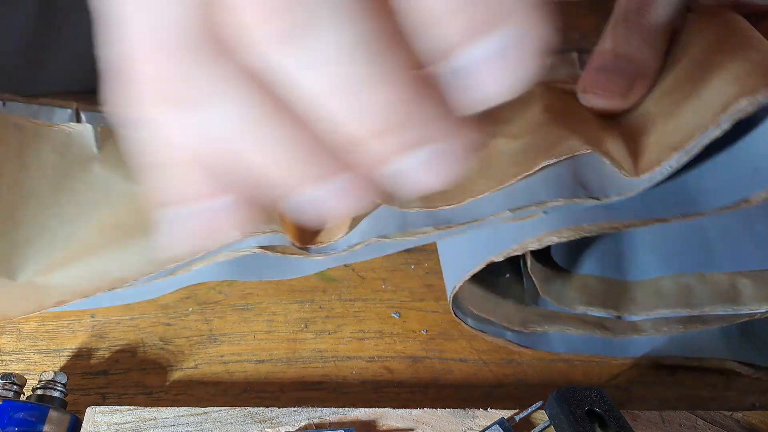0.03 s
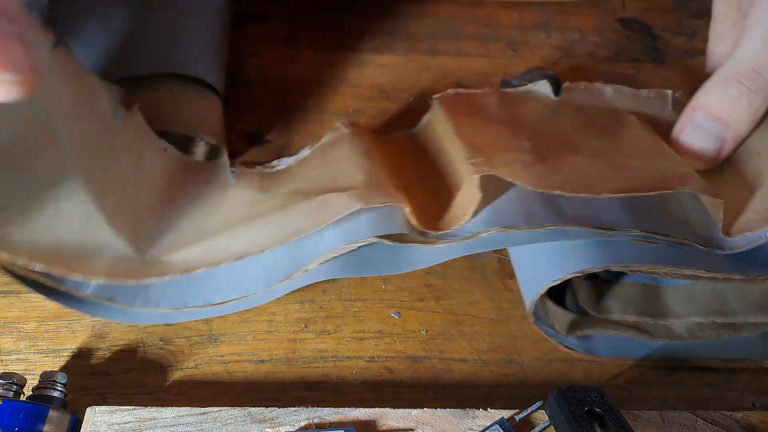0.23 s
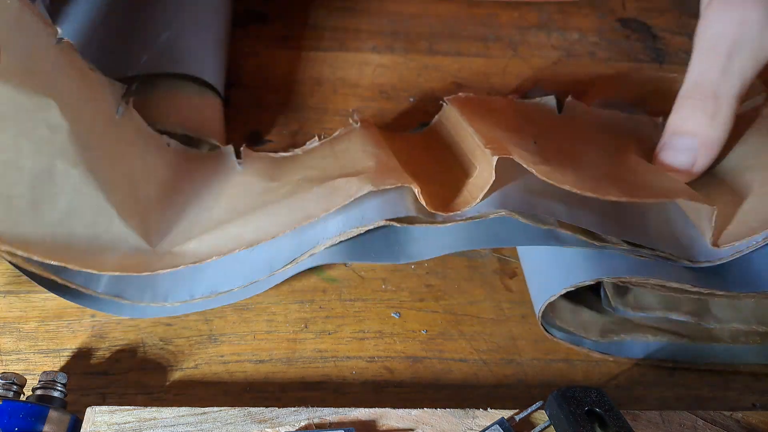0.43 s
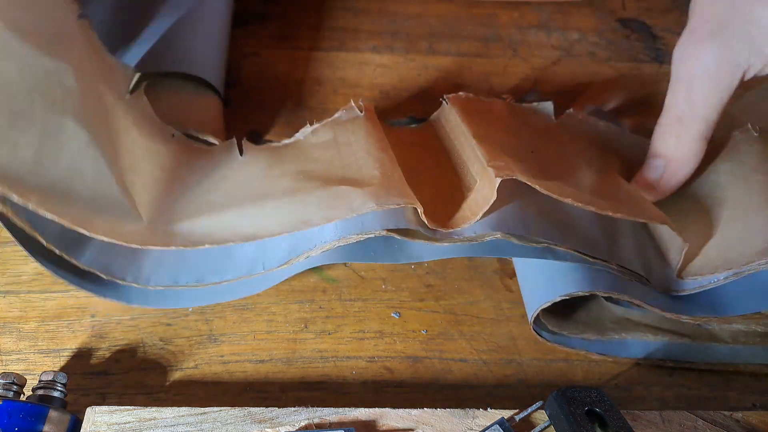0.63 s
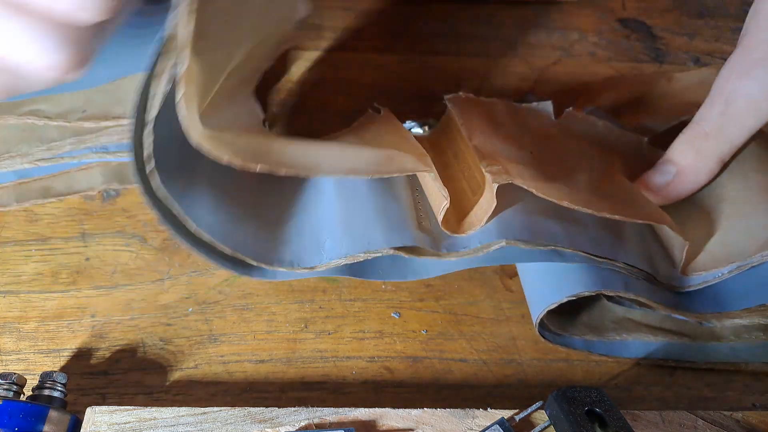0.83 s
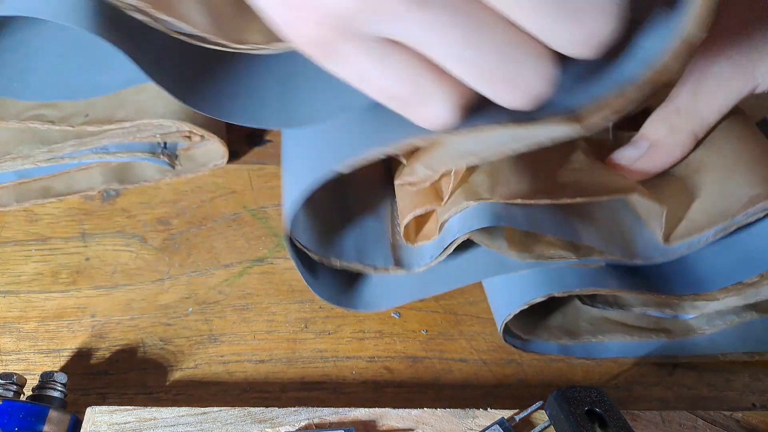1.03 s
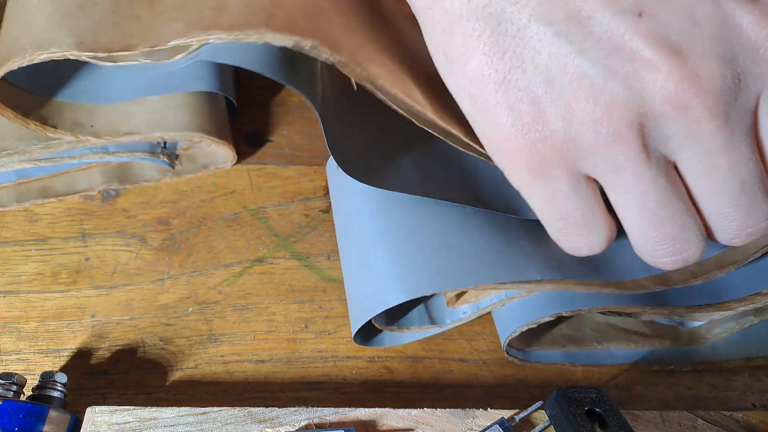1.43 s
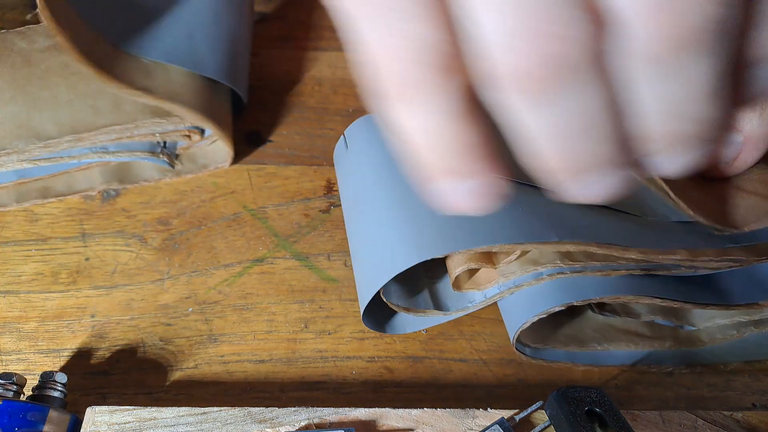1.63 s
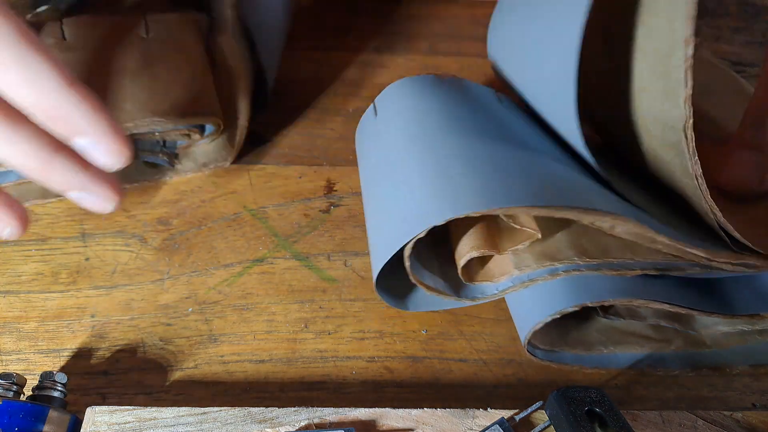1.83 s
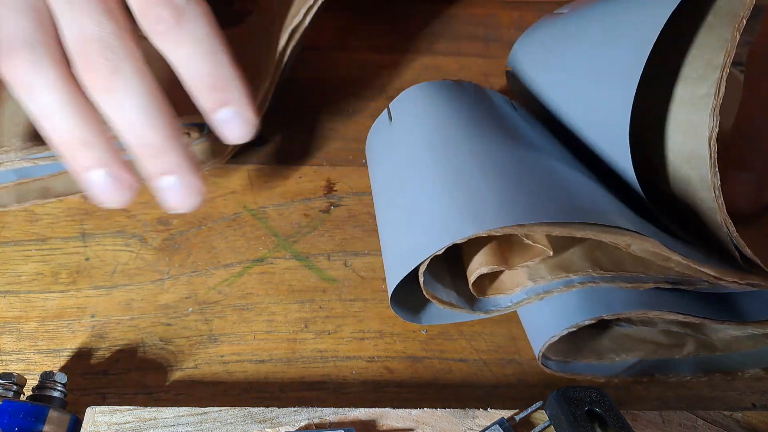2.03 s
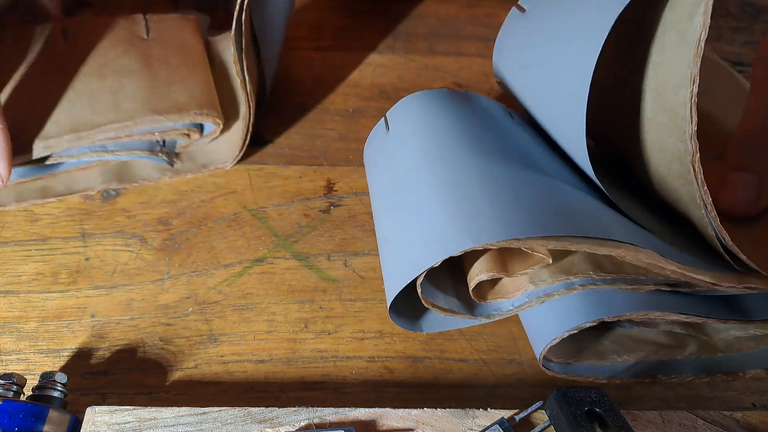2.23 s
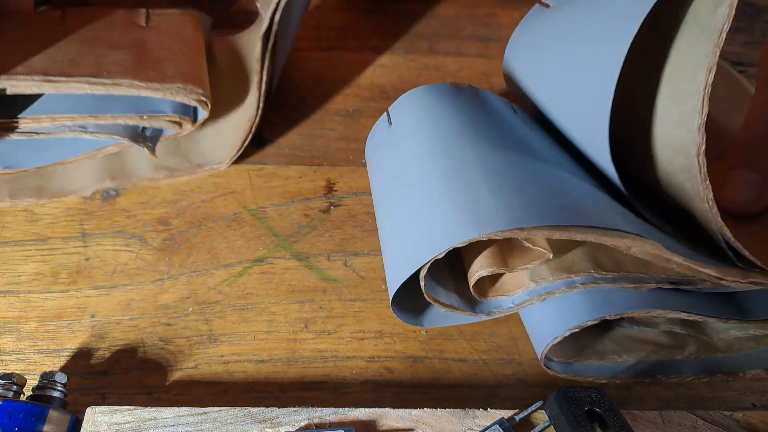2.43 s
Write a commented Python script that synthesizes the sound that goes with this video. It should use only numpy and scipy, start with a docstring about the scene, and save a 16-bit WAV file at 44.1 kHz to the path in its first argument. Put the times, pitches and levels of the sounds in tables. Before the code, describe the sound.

Foil and paper crinkle and rustle close to a stereo microphone in a quiet room. Scattered crease snaps build to a sharper cluster as the strips fold, then fade to light rustles, with soft table bumps underneath.

```python
"""A wooden table in a small quiet room, a stereo pair of microphones close to the hands.
Stiff strips of foil and paper are unrolled and folded. Sliding, they rustle with tiny clicks; bending,
they swish and pop. Creases snap through, each ringing the sheet for a few ms, and in the taut fold the
foil rings on. Hands and rolls bump the table softly, and the walls answer the sheets with a short tail."""
import sys
import numpy as np
from scipy import signal
from scipy.fft import rfft, irfft
from scipy.io import wavfile

SR = 44100
rng = np.random.default_rng(int(sys.argv[2]) if len(sys.argv) > 2 else 0)


def master(y):
    """Save y as 16-bit WAV."""
    cut = np.clip(np.atleast_2d(y).T, -1, 1)
    pcm = np.round(cut * 32767)  # scale
    wavfile.write(sys.argv[1], SR, pcm.astype(np.int16))


N = 110250

# Creases snapping through. Each row: start in seconds, low, middle, high and top band levels in dB,
# the facet's own note in Hz, its relative level in dB, left over right in dB.
SNAPS = [(0.0244, -50, -45.0, -45, -55, 4370, -47, -3), (0.054, -49.0, -50, -37.5, -43, 2800, -37, 5.0),
         (0.1166, -43.0, -43, -59, -59, 1542, -38, -4), (0.2103, -37.5, -42, -44, -55, 1840, -33, -4),
         (0.2305, -52, -47, -42, -53, 6550, -34, 1), (0.3025, -39.5, -44, -42, -55.0, 3920, -37, 1),
         (0.3403, -36.5, -31.5, -35, -43.0, 1860, -40, -4.5), (0.3981, -61, -55.0, -44, -49, 6330, -44, 2),
         (0.462, -43, -43.0, -35, -45, 6050, -42, 1.0), (0.5224, -35.5, -41, -41.0, -59, 3560, -29, -2.5),
         (0.5709, -45.5, -48.0, -41.5, -49, 2000, -49, -5), (0.6136, -50, -49, -45, -39.5, 1900, -46, -14),
         (0.6841, -54, -47, -33.5, -32, 4800, -34, -5), (0.7446, -64, -47, -34, -49.0, 5430, -36, 9),
         (0.8394, -48.5, -44.5, -45, -54, 1770, -53, -1), (0.8688, -66, -46, -30.5, -31.5, 6000, -37, -2.5),
         (0.8887, -36, -31.5, -26.5, -26, 1980, -31.5, 2.0), (0.9135, -58, -58, -30, -38, 6520, -40, -9),
         (0.9217, -56, -47, -32, -33, 5330, -36, -4.0), (0.943, -54, -35.5, -38.0, -48, 4100, -34, 13.0),
         (0.988, -52, -35, -53, -50.0, 2490, -29.5, -3), (1.0184, -52, -42, -35.0, -42, 6450, -30, 17),
         (1.0265, -50, -40, -38, -42, 5200, -42, 4), (1.0647, -54, -37, -38, -54, 2000, -41, 5),
         (1.1032, -40, -48, -49, -42, 3970, -41, 0), (1.1192, -36.5, -23.5, -20.5, -21.0, 2810, -21, -4),
         (1.1343, -50, -43, -38, -35, 2500, -40, -4), (1.146, -50, -43, -36, -37, 4800, -40, -3),
         (1.15, -54, -40, -36, -30.0, 4760, -41, -8.0), (1.1579, -59, -40, -32, -37, 4820, -19.5, -7),
         (1.1721, -44, -33, -34.0, -39.0, 2790, -29, 1), (1.2184, -49, -39, -40, -52.0, 2580, -28.5, 4.0),
         (1.2281, -35, -38.5, -27, -27.5, 6140, -25, -4.0),
         (1.2556, -36.5, -50, -38.5, -36.0, 4690, -35, -7), (1.269, -54, -35, -39.5, -39, 6700, -27, 6),
         (1.2922, -49, -49, -37.5, -36, 2560, -34, -1.5), (1.3199, -50, -41, -45.5, -55, 3530, -30, 0),
         (1.3914, -42.5, -36.5, -36.0, -41.0, 5030, -30, -6), (1.441, -52, -54, -53, -60, 3900, -54, 0),
         (1.5083, -44, -42, -41.5, -52, 3620, -49, 2), (1.5642, -42.5, -32, -32.5, -35, 3496, -25.5, -2),
         (1.5806, -48, -57, -34.5, -34, 4770, -36, 2), (1.5971, -40, -35.5, -36.5, -49, 2820, -40, 7),
         (1.6337, -65, -37, -38.5, -47, 4470, -41, 8), (1.6505, -49, -50, -28.5, -30, 3840, -40, 7),
         (1.711, -49.5, -41.5, -33, -45.5, 6570, -46, 0), (1.7305, -50, -52, -46, -50, 1610, -50, 0),
         (1.7656, -49, -42, -40, -51, 1900, -38, -1), (1.8179, -57, -48.5, -50.5, -41.5, 4230, -54, 1),
         (1.9202, -54, -53, -58, -66, 1500, -53, 2), (1.9725, -42.5, -38.5, -29, -29.5, 3340, -29, -5.5),
         (2.026, -60, -54, -64.5, -68.0, 2730, -49, 4), (2.1219, -60.5, -59.5, -70, -80, 2190, -49, -15),
         (2.3421, -60, -60.0, -44, -41, 6200, -45, 6), (2.4543, -53, -55, -47, -46.5, 5760, -49, 9)]
# The sliding of the sheets. Each row: time in seconds, relative low, middle and treble levels in dB,
# left over right in dB.
SLIDING = [(0, -60, -50.5, -56, -0.5), (0.042, -50, -43, -45.5, 0), (0.075, -55, -51, -56, -2),
           (0.11, -53, -46.5, -49.5, 2), (0.15, -47.5, -39.5, -43.5, 1.5), (0.26, -50.5, -44.5, -48.5, 2.5),
           (0.31, -46, -42.5, -45.5, 0.5), (0.38, -49.5, -44.5, -50, -1), (0.42, -42, -38.5, -40.5, -1.5),
           (0.46, -47.5, -39, -42, 1.5), (0.505, -52, -50.5, -55, -4), (0.55, -50.5, -48, -55, -2),
           (0.595, -52, -51, -53.5, -1), (0.62, -52, -38, -39, -4.5), (0.65, -55, -53.5, -56, -4),
           (0.675, -50, -47, -53, 0), (0.705, -53, -44.5, -41.5, 2.5), (0.745, -54.5, -45, -56, 1),
           (0.78, -64.5, -57, -65, 1), (0.83, -60.5, -54, -57, 0), (0.86, -53, -50, -53, -1),
           (0.905, -47, -41, -47, -1), (0.925, -54, -38.5, -51, 0), (0.965, -48, -44.5, -55, -0.5),
           (1.031, -42.5, -36, -42, 0.5), (1.09, -47.5, -44, -48, -1), (1.14, -43.5, -38.5, -45, -1.5),
           (1.2, -47.5, -37, -42.5, -2), (1.265, -44, -40, -48, 5.5), (1.31, -54, -48, -53, -4),
           (1.37, -51.5, -48.5, -53.5, 1), (1.44, -52.5, -52.5, -59.5, -0.5), (1.49, -58, -51.5, -52, -1),
           (1.55, -43.5, -41.5, -47, 0), (1.6, -55, -40.5, -53, -1), (1.667, -45, -42, -42, 2),
           (1.695, -64, -53, -67, 0), (1.75, -57.5, -52, -55.5, 0), (1.805, -61.5, -56, -64, 5.5),
           (1.856, -54, -48.5, -53, 2), (1.885, -58.5, -58, -63, -1), (1.96, -55.5, -55, -59, 0.5),
           (2.0, -60, -54, -71, 1), (2.05, -72, -61.5, -72, 2), (2.14, -68, -64, -67, 1.5),
           (2.2, -92, -76.5, -80.5, 0.5), (2.24, -88, -80.5, -77, 3), (2.292, -80, -66, -68.5, 4),
           (2.31, -63, -49, -51.5, 10), (2.335, -57.5, -46, -50, 1.5), (2.365, -70, -57.5, -67, 4),
           (2.395, -71, -64, -65, 3), (2.42, -63.5, -55, -58, 7), (2.5, -68, -51.5, -55.5, 0.5)]
# The colour of the sheets. Each row: frequency in Hz, relative level in dB.
SHEET_COLOUR = [(88, -34.5), (150, -14), (201, -4), (240, -13), (524, -11), (612, -10.5), (1080, -5.5),
                (1450, -3.5), (3040, -1.5), (3620, -0.5), (6770, -2), (7620, -6), (12200, -3),
                (15100, -9.5), (16000, -15)]


def amp(db):
    """Decibels to gain."""
    return 10 ** (np.asarray(db) / 20)


def unit(x):
    """Scale to an rms of one."""
    return x / np.sqrt(np.mean(x ** 2))


def fade(t, t60):
    """A decay that loses 60 dB in t60 seconds."""
    return np.exp(-np.log(1000) * t / t60)


def colour(x, points, lo_hz=0, hi_hz=1e6):
    """Filter by (Hz, dB) points, between two band edges."""
    f = np.maximum(np.arange(N + 1) * SR / (2 * N), 1)
    hz, db = np.array(points, float).T
    band = 1 / np.sqrt((1 + (lo_hz / f) ** 10) * (1 + (f / hi_hz) ** 10))
    gain = amp(np.interp(np.log(f), np.log(hz), db))
    return irfft(rfft(x, 2 * N) * band * gain)[..., :N]


def place(pan_db):
    """Left and right gains at constant power."""
    gains = amp(np.array([pan_db, -pan_db]).reshape(2, -1) / 2)
    return gains / np.sqrt(np.mean(gains ** 2, axis=0))


def convolve(x, response):
    """Pass a sound through a response."""
    return signal.fftconvolve(np.atleast_2d(x), np.atleast_2d(response), axes=1)[:, :N]


def add(out, start, sound):
    """Mix a short sound in at a time in seconds."""
    part = out[:, int(start * SR):][:, :sound.shape[-1]]
    part += sound[..., :part.shape[1]]


def ring(modes):
    """Half a second of decaying modes, each starting at a chance phase."""
    t = np.arange(SR // 2) / SR
    return sum(amp(db) * fade(t, t60) * np.sin(2 * np.pi * (hz * t + rng.random()))
               for hz, db, t60 in modes)


def note(hz, t60, apart_cycles=0.25):
    """One short mode of a patch of sheet, swelling over a cycle or two, out of phase between the sides."""
    t = np.arange(SR // 16) / SR
    phase = rng.random() + rng.choice([-1, 1]) * np.array([[0], [apart_cycles]])
    swell = 1 - np.exp(-(t * hz) ** 2)
    return np.sin(2 * np.pi * (hz * t + phase)) * fade(t, t60) * swell


def sheet_noise(lo_hz, hi_hz):
    """The sheet's many overlapping modes in one band, unrelated at the two microphones."""
    return colour(rng.standard_normal((2, N)), SHEET_COLOUR, lo_hz, hi_hz)


def shifting_noise(lo_hz, hi_hz, bands=3, flicker_db=2, flicker_per_s=45):
    """Sheet noise whose neighbouring bands swell and fade on their own as the contacts move."""
    edges = np.geomspace(lo_hz, hi_hz, bands + 1)
    steps = np.arange(N) / SR * flicker_per_s
    out = 0
    for lo, hi in zip(edges, edges[1:]):
        noise = sheet_noise(lo, hi)
        flicker = np.interp(steps, np.arange(1000), rng.standard_normal(1000))
        out += noise * amp(flicker_db * flicker)
    return unit(out)


def room_air(level_db=-83):
    """The faint steady air of the room, mostly bass."""
    # Each row: frequency in Hz, relative level in dB.
    spectrum = [(30, -6), (120, -3.5), (300, -16), (2000, -20), (6000, -19), (16000, -35.5)]
    return amp(level_db) * unit(colour(rng.standard_normal((2, N)), spectrum))


def rustle(t, clicks_per_s=900, click_fall_s=0.0021, clicks_db=-2.5, rubbing_db=-4, spread_db=2.5):
    """Sliding sheets catch and slip: a shower of tiny clicks of uneven size over smooth rubbing."""
    edges_hz = (750, 2000, 7000, 17000)
    times, *levels, pan = np.array(SLIDING, float).T
    slips = rng.random(N) < clicks_per_s / SR
    clicks = slips * amp(spread_db * np.minimum(rng.exponential(size=N), 4.5))
    power_decay = np.exp(-2 * t[:SR // 20] / click_fall_s)
    out = 0
    for db, lo, hi in zip(levels, edges_hz, edges_hz[1:]):
        band_clicks = clicks * amp(2.5 * rng.standard_normal(N))  # each click has its own colour
        power = np.abs(convolve(band_clicks ** 2, power_decay))
        grain = np.sqrt(power / power.mean() * amp(clicks_db) ** 2 + amp(rubbing_db) ** 2)
        out += grain * shifting_noise(lo, hi) * amp(np.interp(t, times, db))
    return out * place(np.interp(t, times, pan))


def swish(t):
    """Whole sheets bend and push the air with a low, uneven swish."""
    # Each row: time in seconds, level in dB.
    bending = [(0, -61), (.12, -59), (.3, -59.5), (.45, -58.5), (.56, -60), (.62, -62), (.75, -62.5),
               (.81, -76.5), (.9, -58), (1.05, -54.5), (1.16, -53.5), (1.3, -58), (1.42, -63.5), (1.5, -60),
               (1.6, -56.5), (1.67, -60), (1.72, -66.5), (1.85, -72.5), (1.98, -70), (2.08, -78.5),
               (2.22, -89.5), (2.33, -74), (2.42, -83), (2.5, -79)]
    return shifting_noise(lo_hz=232, hi_hz=763, bands=2) * amp(np.interp(t, *np.array(bending).T))


def crackles(per_s=220, lo_hz=1380, hi_hz=8870, gain_db=-3):
    """Small facets flip at random, each at its own pitch, following the loudness of the sliding."""
    times, _, middle, _, pan = np.array(SLIDING, float).T
    out = np.zeros((2, N))
    for when, pitch, size, side in rng.random((int(per_s * N / SR), 4)):
        start = when * N / SR
        hz = lo_hz * (hi_hz / lo_hz) ** pitch
        db = np.interp(start, times, middle) + gain_db - 2.5 * np.log(size + .06)  # a few stand out
        pan_db = np.interp(start, times, pan) + 12 * (side - .5)
        add(out, start, amp(db) * place(pan_db) * note(hz, t60=0.01))
    return out


def table_rumble(t, apart=0.94):
    """Sheets and hands moving on the table make a rumble, partly common to both microphones."""
    # Each row: time in seconds, level in dB.
    handling = [(0, -66), (.35, -66), (.55, -77), (.72, -56), (.81, -74), (.88, -62.5), (1.35, -61),
                (1.5, -66.5), (1.68, -60.5), (1.82, -75), (2.2, -78.5), (2.5, -75.5)]
    # Each row: frequency in Hz, relative level in dB.
    spectrum = [(20, -32), (38, -13), (56, 3), (85, -0.5), (120, -7.5), (170, -6.5), (215, -8), (300, -12),
                (900, -56)]
    noise = rng.standard_normal(N) + apart * rng.standard_normal((2, N))
    return unit(colour(noise, spectrum)) * amp(np.interp(t, *np.array(handling).T))


def table_bumps(t, push_s=0.0081, gain_db=2):
    """Soft pushes from hands and rolls ring the table top."""
    # Each row: start in seconds, relative level in dB.
    bumps = [(.005, -58), (.16, -73), (0.333, -50.5), (0.521, -61.5), (.6, -57), (0.717, -58), (.856, -64),
             (1.135, -61), (1.199, -55.5), (1.268, -46), (1.59, -69), (1.675, -62.5), (1.89, -71),
             (2.01, -72.5), (2.14, -70.5), (2.387, -76)]
    # The wood's modes. Each row: frequency in Hz, relative level in dB, seconds to fall 60 dB.
    table_modes = [(57, -3.5, 0.3), (84.4, -5, 0.21), (142, -6, 0.21), (173, 4, 0.085), (208.6, -2, 0.22)]
    push = 1 - np.exp(-t[:SR // 2] / push_s)
    out = np.zeros((2, N))
    for start, db in bumps:
        add(out, start, amp(db + gain_db) * ring(table_modes) * push)
    return out


def snaps(t, hard_attack_s=0.0004, soft_extra_s=0.00045, hold_s=0.0018, fall_at_5khz_s=0.0039):
    """A crease buckles, the weaker the more slowly; then the sheet's ring dies, the treble first."""
    edges_hz = (600, 2000, 4000, 7500, 17000)
    hard_db, soft_range_db = -27.5, 15.5
    out = np.zeros((2, N))
    for band, (lo, hi) in enumerate(zip(edges_hz, edges_hz[1:])):
        fall_s = fall_at_5khz_s * (5000 / np.sqrt(lo * hi)) ** 0.23
        envelope = np.zeros((2, N))
        for start, *levels, _, _, pan in SNAPS:
            onset = int(start * SR)
            near = slice(max(onset - SR // 200, 0), onset + SR // 20)
            age = t[near] - start
            softness = np.clip((hard_db - max(levels)) / soft_range_db, 0, 1)
            attack_s = hard_attack_s + soft_extra_s * softness
            shape = np.exp(np.minimum(age, 0) / attack_s - np.maximum(age - hold_s, 0) / fall_s)
            envelope[:, near] += amp(levels[band]) * shape * place(pan)
        out += envelope * unit(sheet_noise(lo, hi))
    return out


def facets(t, note_gain_db=1.5, ring_cycles=71, crack_gain_db=3.5, crack_fall_s=0.0004, lag_s=0.00022):
    """Each snap rings its own facet and opens with a crack that reaches the nearer microphone first."""
    out = np.zeros((2, N))
    age = t[:SR // 200]
    for start, *_, top_db, hz, db, pan in SNAPS:
        add(out, start, amp(db + note_gain_db) * place(pan) * note(hz, t60=ring_cycles / hz))
        bright_noise = np.diff(rng.standard_normal(len(age) + 1))
        crack = amp(top_db + crack_gain_db) * bright_noise * np.exp(-age / crack_fall_s)
        for mic, farther in enumerate((pan < 0, pan >= 0)):
            add(out[mic:mic + 1], start + farther * lag_s, place(pan)[mic] * crack)
    return out


def flex_pops():
    """Wide curved patches of sheet flex with a lower, hollow pop."""
    # Each row: start in seconds, main note in Hz, level in dB.
    pops = [(.159, 450, -40.5), (.969, 442, -50), (1.067, 574, -42), (1.135, 430, -35), (1.172, 600, -39),
            (1.361, 574, -40.5), (1.566, 1277, -37.5), (1.6, 924, -39), (1.612, 1096, -37.5),
            (1.658, 346, -43.5), (1.766, 768, -46.5)]
    # A patch's modes. Each row: ratio to the main note, relative level in dB.
    patch_modes = [(.74, -7.5), (1, 1), (1.33, -6)]
    out = np.zeros((2, N))
    for start, hz, db in pops:
        for ratio, mode_db in patch_modes:
            add(out, start, amp(db + mode_db) * note(hz * ratio, t60=0.032, apart_cycles=0.075))
    return out


def foil_ring(fold_from_s=0.99, fold_to_s=1.26, gain_db=-19.5):
    """Snaps in the taut fold leave a faint metallic ring in proportion to their strength."""
    # Each row: frequency in Hz, relative level in dB, seconds to fall 60 dB.
    foil_modes = [(2480, 0, 0.32), (2560, -2.5, 0.83), (2860, -3, 0.13), (3240, 15, 0.067), (3320, -7, .3),
                  (4400, -6.5, 0.17), (4960, 6, 0.32), (4570, 5, 0.22), (6600, -10, .15), (7122, -8.5, .15)]
    out = np.zeros((2, N))
    for start, _, middle_db, *_ in SNAPS:
        if fold_from_s < start < fold_to_s:
            add(out, start, amp(middle_db + gain_db) * np.array([ring(foil_modes), ring(foil_modes)]))
    return out


def room(x, gain_db=-14, low_t60=0.27, top_t60=0.22, split_hz=7000, delay_s=0.008):
    """A short diffuse tail from the walls, duller as it fades."""
    t = np.arange(SR // 2) / SR
    tail = 0
    for side, t60 in (("low", low_t60), ("high", top_t60)):
        band = signal.butter(2, split_hz, side, fs=SR, output="sos")
        tail += signal.sosfilt(band, rng.standard_normal((2, len(t)))) * fade(t, t60) * (t > delay_s)
    tail /= np.sqrt(np.sum(tail ** 2) / 2)
    return amp(gain_db) * convolve(x.sum(axis=0) / np.sqrt(2), tail)


def microphones(x, shared_hz=600):
    """Two closely spaced microphones hear the bass much alike and colour the treble differently."""
    # Each row: frequency in Hz, left over right in dB.
    balance = [(200, 2), (700, -0.5), (1400, 2), (3500, -1.5), (6000, 1.5), (9000, -0.5), (12500, -5.5),
               (16000, -7.5)]
    mid = colour((x[0] + x[1]) / 2, [(shared_hz / 2, 2), (shared_hz * 2, 0)])
    side = colour((x[0] - x[1]) / 2, [(shared_hz / 2, -4), (shared_hz * 2, 0)])
    left = colour(mid + side, [(hz, db / 2) for hz, db in balance])
    right = colour(mid - side, [(hz, -db / 2) for hz, db in balance])
    return np.array([left, right])


def scene():
    """Sheets and room at the close pair, with the table's low sounds underneath."""
    t = np.arange(N) / SR
    air = room_air()
    table = table_bumps(t) + table_rumble(t)
    sheets = snaps(t) + facets(t) + flex_pops() + foil_ring() + rustle(t) + swish(t) + crackles()
    return microphones(sheets + room(sheets) + air) + table


def record(dry):
    """The recorder cuts the top steeply above 16 kHz."""
    return signal.sosfilt(signal.ellip(10, .2, 75, 16000, fs=SR, output="sos"), dry)


dry = scene()
out = record(dry)
master(out)
```